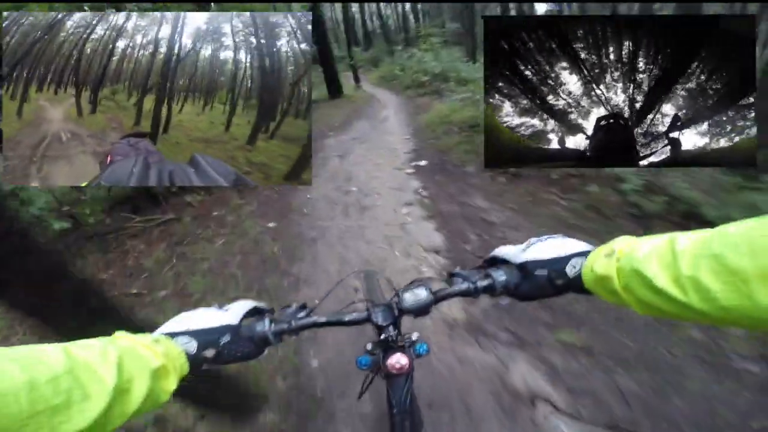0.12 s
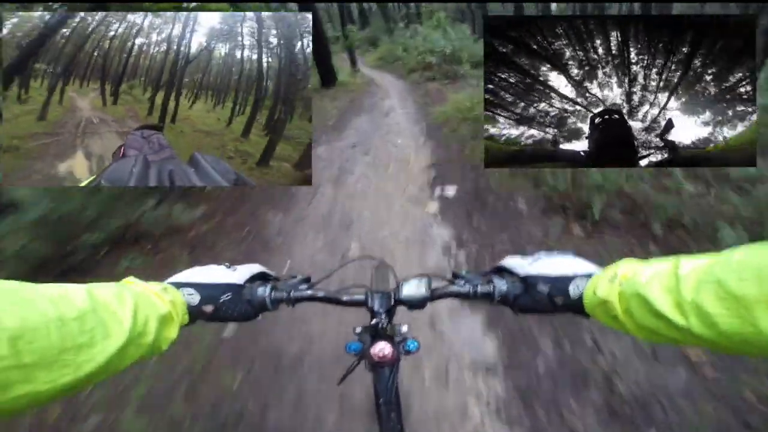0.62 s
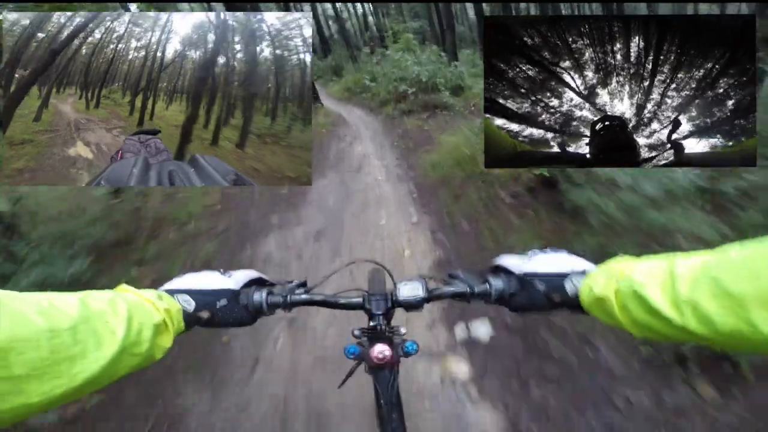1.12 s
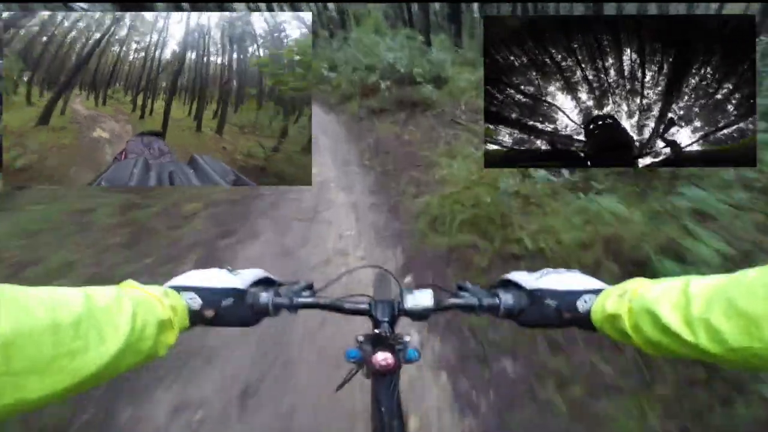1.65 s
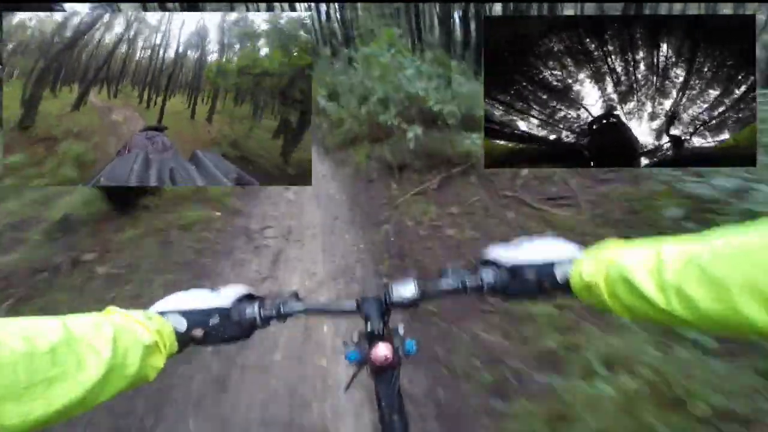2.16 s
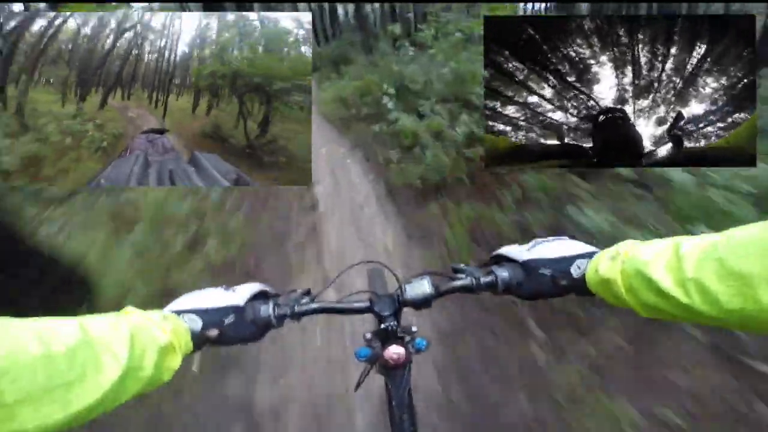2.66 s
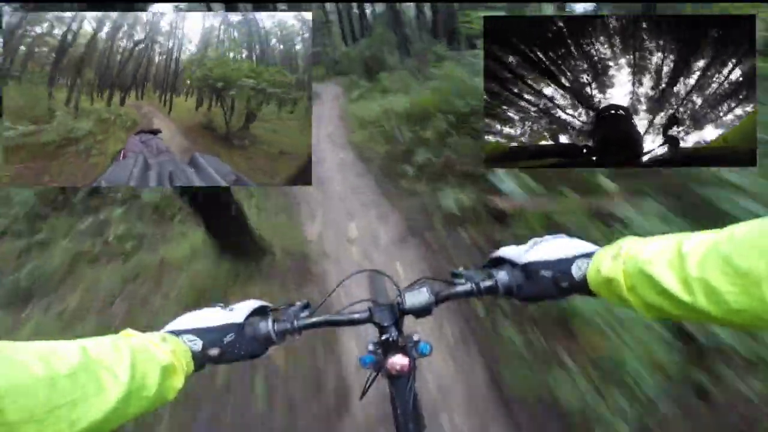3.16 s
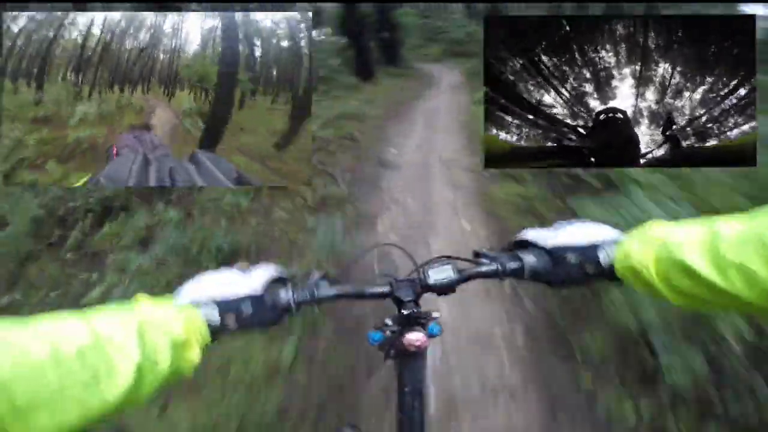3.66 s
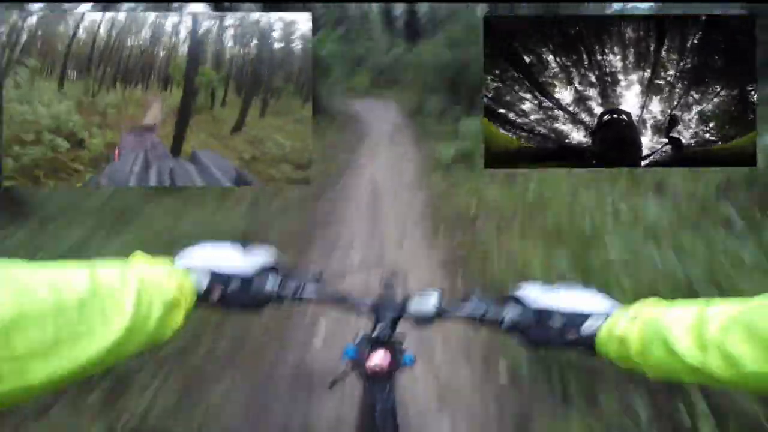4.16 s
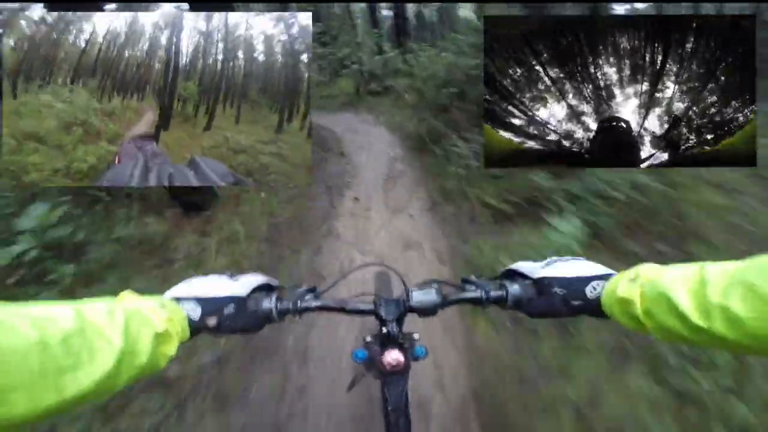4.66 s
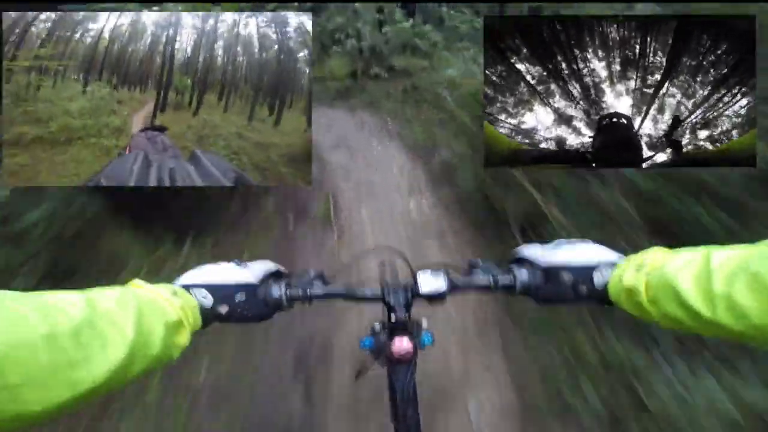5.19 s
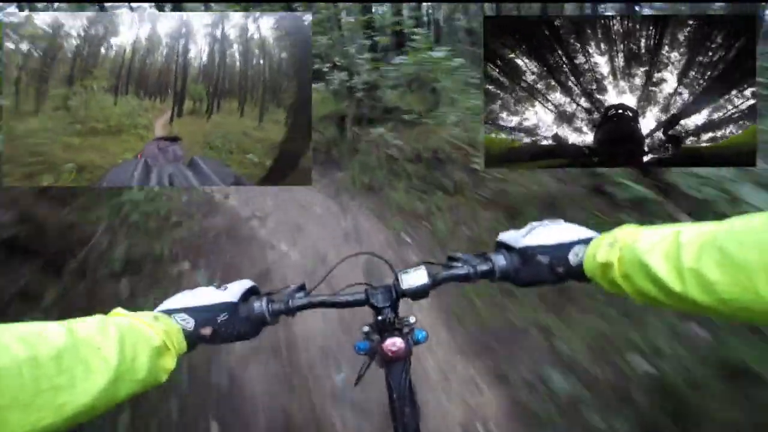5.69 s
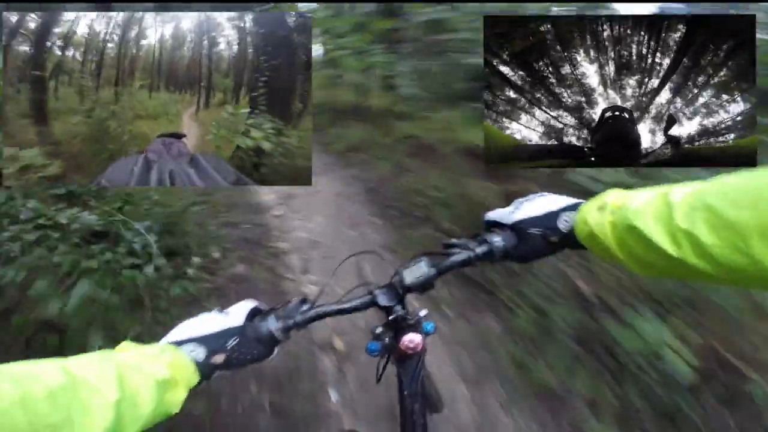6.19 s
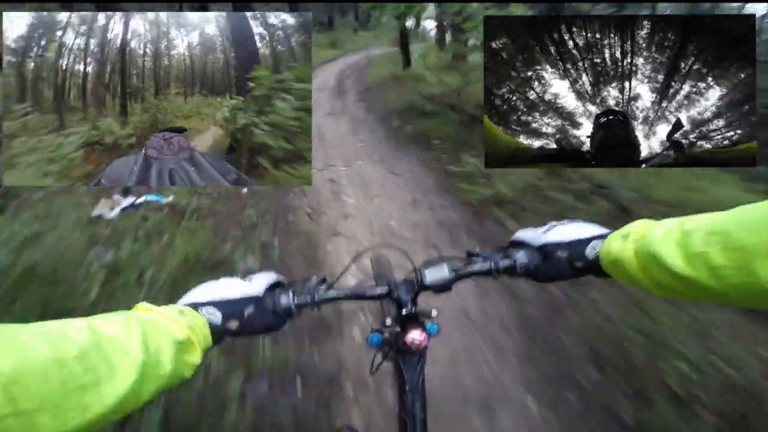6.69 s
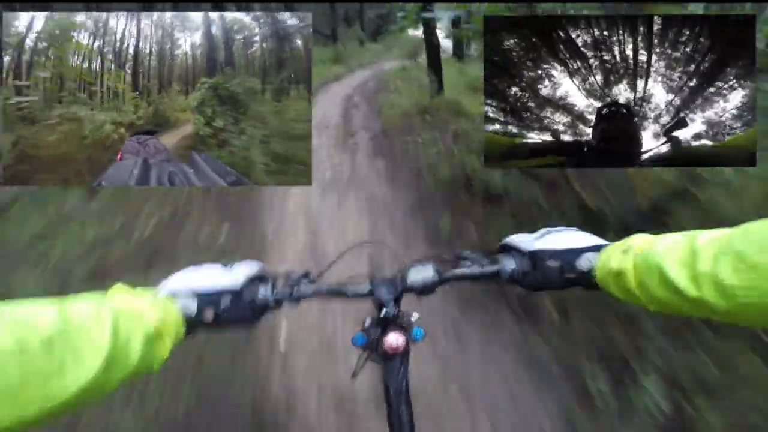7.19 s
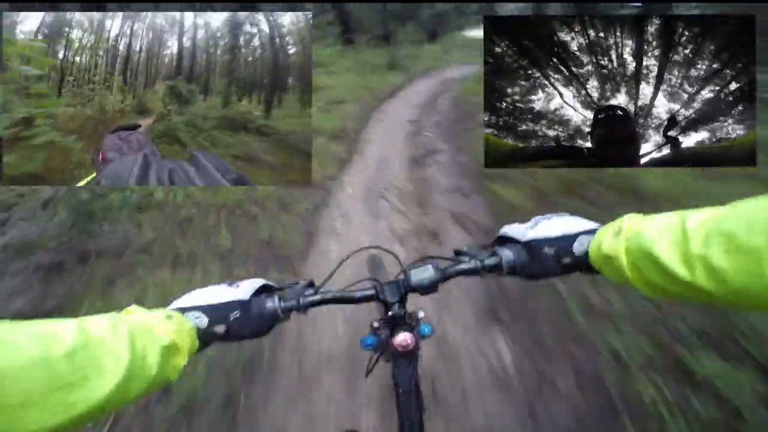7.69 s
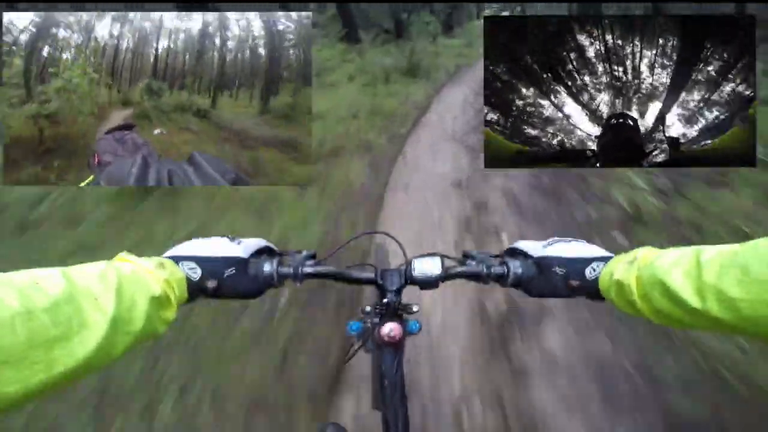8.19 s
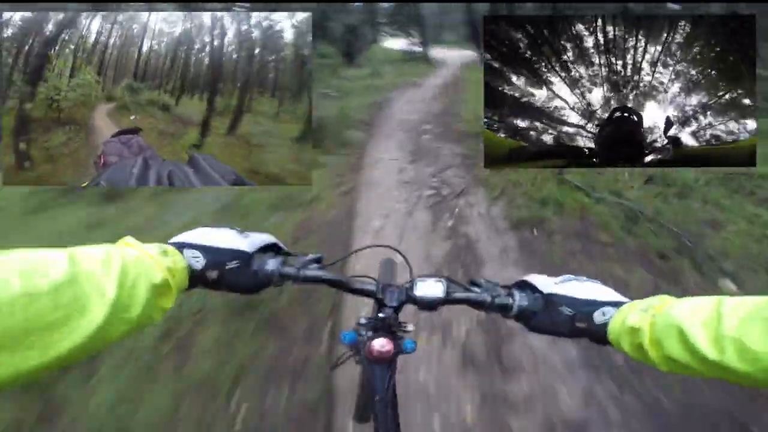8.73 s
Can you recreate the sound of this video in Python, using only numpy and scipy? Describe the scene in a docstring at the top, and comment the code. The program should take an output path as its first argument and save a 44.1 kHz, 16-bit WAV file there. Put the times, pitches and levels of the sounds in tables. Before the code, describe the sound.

Muffled tyre crunch and low bump rumbles on a forest trail, with plastic clatter, hard clicks, brief strap squeaks and faint electronic whine.

```python
"""Fast dirt-trail ride

A mountain bike rolls fast down a dirt trail; the microphone sits in a small camera, in a plastic case
strapped to the rider. Slow noise and short swings make the case heave, thud and rumble over bumps; cracks
in coloured noise are tyres and flung grit; slips ring two squeaks as straps scuff the case; clicks ring
its modes as the camera rattles and snaps inside; steady tones and hiss are the electronics."""
import sys
import numpy as np
from scipy import signal
from scipy.fft import rfft, irfft
from scipy.io import wavfile
from scipy.ndimage import uniform_filter1d

SR = 44100
rng = np.random.default_rng(int(sys.argv[2]) if len(sys.argv) > 2 else 0)


def gain_from_decibels(decibels):
    """Convert decibel values to linear amplitude factors."""
    exponent = np.asarray(decibels, float) / 20
    return 10 ** exponent


def put_to_file(sound):
    """Save the sound as 16-bit audio at rate SR, in the file named by the first command-line argument."""
    columns = np.atleast_2d(sound).T  # one column per channel
    safe = np.clip(columns, -1, 1)
    whole_steps = np.round(safe * 32767)
    wavfile.write(sys.argv[1], SR, whole_steps.astype(np.int16))


N = 389844


def rms_one(x):
    """Scales a signal to rms 1."""
    return x / np.sqrt(np.mean(x ** 2) + 1e-20)


def in_time(rows):
    """Draws straight lines between the rows of a table whose first column is time."""
    s, *columns = np.transpose(rows)
    return [np.interp(np.arange(N) / SR, s, c) for c in columns]


def coloured(x, points):
    """Shapes a signal to a spectrum drawn on a log frequency axis; rms 1."""
    hz, db = np.transpose(points)
    grid = np.maximum(np.arange(N // 2 + 1) * SR / N, 1)
    gain_db = np.interp(np.log(grid), np.log(hz), db, -120, -120)
    return rms_one(irfft(rfft(x) * gain_from_decibels(gain_db), N))


def drift(rate_hz):
    """Slow noise, rms 1: every 20th sample through two equal one-pole low-passes, already run in."""
    r = np.exp(-40 * np.pi * rate_hz / SR)
    slow = signal.lfilter([1], [1, -2 * r, r * r], rng.standard_normal(N // 20 + 2002))[2000:]
    return np.interp(np.arange(N) / 20, np.arange(len(slow)), rms_one(slow))


def ring(clicks, hz, t60):
    """A resonance: a unit click starts a sine of height 1 that falls 60 dB in t60 seconds."""
    r, w = gain_from_decibels(-60 / (t60 * SR)), 2 * np.pi * hz / SR
    return signal.lfilter([0, np.sin(w)], [1, -2 * r * np.cos(w), r * r], clicks + 1e-18)


def grit(per_s, spread_db, share):
    """Random cracks of uneven size over smooth noise; share is the cracks' part of the power."""
    sizes = gain_from_decibels(spread_db * np.minimum(rng.exponential(1, N), 5)) * rng.choice([-1, 1], N)
    share = np.clip(share, 0, 1)
    cracks = rms_one(sizes * (rng.random(N) < per_s / SR))
    return np.sqrt(share) * cracks + np.sqrt(1 - share) * rng.standard_normal(N)


def evened(x, size):
    """Holds the loudness of a slow noise nearly steady over a window of size samples."""
    return x / np.sqrt(uniform_filter1d(x ** 2, size=size) + 0.094)


def bumps(times, peaks_db, ground_db, rise, fall):
    """Gain that climbs to each peak and falls away (dB per second), added in power to the ground."""
    t = np.arange(0, N + 100, 100) / SR
    late = t - times[:, None]
    slope_db = np.where(late < 0, rise * late, -fall * late)
    power = gain_from_decibels(2 * (peaks_db[:, None] + slope_db)).sum(axis=0)
    return np.sqrt(np.interp(np.arange(N) / SR, t, power) + gain_from_decibels(2 * ground_db))


def swings(times, peaks_db, hz, width):
    """One soft to-and-fro at each time, at 0.78 to 1.07 of hz and in any phase, under a bell curve."""
    late = np.linspace(-3 * width, 3 * width, int(6 * width * SR))
    out = np.zeros(N + len(late))
    for s, db, (tune, turn) in zip(times, peaks_db, rng.random((len(times), 2))):
        cycles = hz * (0.78 + 0.29 * tune) * late + turn
        swing = np.sin(2 * np.pi * cycles) * np.exp(-(late / width) ** 2)
        out[int((s + late[0]) * SR):][:len(late)] += gain_from_decibels(db) * swing / np.abs(swing).max()
    return out[:N]


# Roughness of the trail between bumps: time_s, heave_db, thud_db, rumble_db
TRAIL_ROUGHNESS = [(0.0, -39, -53, -55), (1.11, -36.5, -52, -54.5), (2.24, -33.5, -51, -51),
                   (3.03, -39, -52, -54.5), (3.69, -35.5, -56, -54), (4.04, -37, -49, -55),
                   (4.23, -42, -49, -67), (4.41, -35, -50, -54.5), (5.93, -30.5, -52, -52.5),
                   (6.18, -40.5, -52, -53), (6.77, -41, -58, -56.5), (6.99, -29.5, -43.5, -55),
                   (7.14, -35.5, -48.5, -53), (8.84, -40, -54.5, -51)]
# The rider's body lurches over a bump: centre_s, peak_db
BODY_LURCHES = [(.69, -29), (1.061, -33), (1.54, -40), (1.85, -27.5), (2.14, -29), (2.339, -31),
                (2.435, -16.5), (2.728, -41), (3.08, -30), (3.4, -35), (3.689, -28), (3.841, -22.5),
                (3.959, -35), (4.1, -22.5), (4.174, -14), (4.279, -13), (4.376, -19), (4.85, -23.5),
                (5.05, -16.5), (5.218, -23), (5.559, -23), (5.76, -26), (5.86, -36), (5.944, -13.5),
                (6.04, -26), (6.861, -24), (7.071, -23), (7.199, -25.5), (7.641, -22.5), (7.93, -20.5),
                (8.151, -36), (8.301, -19)]
# Colour of the heaving case: frequency_hz, density_db
HEAVE_COLOUR = [(3.5, -10), (6.0, 7), (16, 5), (27, -2.5), (36, -14.5), (70, -24.5), (91, -26), (150, -120)]


def heave():
    """The case heaves slowly on its straps and swings once at each lurch of the rider's body."""
    heave_db = in_time(TRAIL_ROUGHNESS)[0]
    slow = evened(coloured(rng.standard_normal(N), HEAVE_COLOUR), size=5000)
    lurches = swings(*np.transpose(BODY_LURCHES), hz=23.3, width=0.025)
    return slow * gain_from_decibels(heave_db + 3.0 * drift(3.8)) + lurches


# A wheel strikes a root or stone: peak_s, thud_db, rumble_db
WHEEL_STRIKES = [(1.06, -49, -60), (1.551, -42, -64), (1.759, -45, -45), (1.99, -57, -40), (2.21, -55, -56),
                 (2.33, -46, -45.5), (2.453, -38, -61), (2.66, -48, -51), (2.98, -44.5, -66),
                 (3.39, -45, -47.5), (3.82, -55, -43), (3.959, -33, -51), (4.08, -38, -54),
                 (4.15, -24.5, -38), (4.229, -33, -42), (4.331, -35, -47.5), (4.38, -35, -59),
                 (5.048, -40, -42), (5.22, -39.5, -46.5), (5.61, -51, -53), (5.88, -40, -54),
                 (5.93, -32.5, -37.5), (6.009, -32.5, -48.5), (6.82, -48, -45.5), (6.989, -46, -60),
                 (7.09, -41, -61), (7.26, -50, -55), (7.625, -33, -40.5), (7.91, -33, -42),
                 (8.16, -47, -74), (8.302, -41, -42)]
# Colour of the thud: frequency_hz, density_db
THUD_COLOUR = [(26, -32), (45, -8.5), (70, -7.5), (140, -10.5), (170, -13.5), (220, -20), (370, -120)]


def thuds():
    """Lumpy low noise swells and dies at each wheel strike, with a single push inside it."""
    thud_db = in_time(TRAIL_ROUGHNESS)[1] + 2.5 * drift(6.0)
    s, peak_db, _ = np.transpose(WHEEL_STRIKES)
    lumps = evened(coloured(grit(55, 1.4, 0.37), THUD_COLOUR), size=3000)
    punches = swings(s, peak_db + 2.5, hz=78, width=0.0062)
    return punches + lumps * bumps(s, peak_db, thud_db, rise=405, fall=398)


# Colour of the rumble: frequency_hz, density_db
RUMBLE_COLOUR = [(82, -34), (140, -7), (247, 0), (436, -10.5), (1000, -24.5), (1300, -17.5), (2200, -120)]


def rumble():
    """Cracks and noise rumble through the case in lumps, swelling and dying at each wheel strike."""
    rumble_db = in_time(TRAIL_ROUGHNESS)[2]
    s, _, peak_db = np.transpose(WHEEL_STRIKES)
    lumps = coloured(grit(150, 3.56, 0.22) * gain_from_decibels(2.1 * drift(14.0)), RUMBLE_COLOUR)
    return lumps * bumps(s, peak_db, rumble_db, rise=200, fall=230)


def pings(per_s):
    """Random small knocks ring at 24 pitches spread over the treble."""
    sizes = gain_from_decibels(1.7 * np.minimum(rng.exponential(1, N), 4)) * (rng.random(N) < per_s / SR)
    dealt = rng.integers(0, 24, N)
    pitches_hz = np.geomspace(3800, 13000, 24)
    return sum(ring(sizes * (dealt == k), hz, 160 / hz) for k, hz in enumerate(pitches_hz))


# Tyres on grit: time_s, roll_db, spray_db (spray is the fine grit)
TYRE_LEVELS = [(0.0, -52.5, -59), (0.62, -52.5, -59), (0.81, -53, -60), (1.7, -52, -60), (1.97, -47, -58.5),
               (2.66, -52.5, -59.5), (3.1, -51.5, -53.5), (3.4, -51.5, -51.5), (3.64, -47.5, -50.5),
               (4.23, -49.5, -55), (4.6, -51, -51.5), (4.87, -48, -52.5), (5.34, -50.5, -53),
               (5.54, -50, -50), (5.93, -50, -55), (6.15, -52.5, -54.5), (6.45, -53, -56),
               (6.67, -52.5, -53.5), (7.06, -48.5, -52.5), (7.48, -48.5, -51.5), (7.58, -51.5, -53.5),
               (8.27, -49.5, -53.5), (8.47, -47.5, -49), (8.84, -52.5, -53.5)]
# Colour of the rolling tread, as heard through the case: frequency_hz, density_db
ROLL_COLOUR = [(410, -16), (700, -7.5), (1090, -8.5), (1550, -1.5), (1720, -5), (2010, -5), (2490, 2.5),
               (3160, -7), (3480, -6.5), (3810, -21), (4200, -12), (5460, -39), (9240, -120)]
# Colour of the fine grit, as heard through the case: frequency_hz, density_db
SPRAY_COLOUR = [(2120, -24), (3600, 1.5), (3800, -4), (4200, 0), (5110, -5), (5810, 0.5), (6170, -2.5),
                (7700, -7), (8300, -13), (9100, -12), (10200, -11), (11500, -17), (13600, -19),
                (15300, -32)]


def tyres():
    """Tread on grit, coloured by the case; roll and spray flicker partly together."""
    roll_db, spray_db = in_time(TYRE_LEVELS)
    # louder spray flickers more, quiet spray is smoother
    lumps = drift(15) * np.interp(spray_db, [-60, -52], [.45, 1])
    roll_flicker = gain_from_decibels(1.38 * lumps + 0.9 * drift(62))
    roll = coloured(grit(1500, 2.7, 0.26) * roll_flicker, ROLL_COLOUR)
    fine = grit(1200, 3.2, 0.41) + 0.29 * rms_one(pings(500))   # some grit rings on frame and spokes
    spray_flicker = gain_from_decibels(2.1 * lumps + 0.51 * drift(60))
    spray = coloured(fine * spray_flicker, SPRAY_COLOUR)
    return gain_from_decibels(roll_db) * roll + gain_from_decibels(spray_db) * spray


# Faint tones of the camera's circuits: pitch_hz, rms_db
CIRCUIT_TONES = [(5846, -69), (8780, -78), (11687, -88), (11719, -86), (14626, -77), (14653, -87),
                 (14686, -91)]
# Colour of the microphone amplifier's steady hiss: frequency_hz, density_db
AMPLIFIER_HISS = [(500, 15.5), (4000, -8.5), (9000, -11.5), (15200, -6), (15600, -40)]


def whine():
    """Faint circuit tones with gently wandering phase, over steady hiss of the microphone amplifier."""
    t = np.arange(N) / SR
    tones = np.zeros(N)
    for hz, db in CIRCUIT_TONES:
        tones += np.sqrt(2) * gain_from_decibels(db) * np.sin(2 * np.pi * hz * t + 0.35 * drift(2.6))
    return tones + gain_from_decibels(-62.5) * coloured(rng.standard_normal(N), AMPLIFIER_HISS)


# Grit flung at the case: start_s, peak_db, pitch_hz
FLUNG_GRIT = [(0.318, -44, 7000), (1.952, -35.5, 6250), (2.3285, -34, 6100), (2.4049, -45, 8500),
              (3.275, -36, 4730), (3.7013, -36, 4670), (3.8102, -41, 6870), (3.9713, -29, 5940),
              (4.15, -38, 5830), (4.2635, -44, 11400), (4.556, -35, 5030), (4.9801, -36, 4550),
              (5.2285, -39, 4640), (5.6116, -36.5, 5800), (7.0904, -37, 7150), (7.4445, -40, 5900),
              (7.602, -37.5, 6100), (7.812, -32.5, 3260), (7.861, -40, 6170), (3.838, -43, 10300)]


def ticks():
    """Each grain is milliseconds of noise in a band around one pitch; strays come at random from the spray."""
    out, t = np.zeros(N + 600), np.arange(600) / SR
    when, size, pitch = rng.random((80, 3)).T   # 80 stray grains
    spray_db = in_time(TYRE_LEVELS)[1][(when * N).astype(int)]
    stray = np.transpose([when * N / SR, spray_db + 5.5 + 3.0 * size, 4200 * 2.6 ** pitch])
    grains = np.vstack([FLUNG_GRIT, stray])
    for (s, peak_db, hz), burst in zip(grains, rng.standard_normal((len(grains), 600))):
        band = signal.butter(2, [hz / 1.27, min(hz * 1.13, 15000)], "band", fs=SR, output="sos")
        tick = signal.sosfilt(band, burst * np.exp(-t / 0.0066))
        out[round(s * SR):][:600] += gain_from_decibels(peak_db) * tick / np.abs(tick).max()
    return out[:N]


# Straps scuffing on the case: start_s, length_s, low_squeak_db, high_squeak_db, hiss_db
STRAP_SCUFFS = [(0.646, .15, -55, -55.5, -70), (1.779, 0.067, -45.5, -56, -57.5),
                (2.235, 0.089, -37, -47, -45), (3.906, 0.058, -53, -37, -45)]
# Colour of the scuffing hiss: frequency_hz, density_db
SCUFF_COLOUR = [(3000, -35), (5100, -14), (5560, -1.5), (6250, 2), (7800, -1.5), (8420, -16), (9680, -5),
                (11400, -20), (12400, -15), (15000, -27)]
# Low and high squeak, each rung twice in a row: pitch_hz, t60_s (of one ring)
STRAP_SQUEAKS = [(2480, 0.0098), (4350, 0.0019)]


def scuffs():
    """Dense slips rub the case: a rough hiss all through the stroke, two squeaks swelling as it bites."""
    slips = (grit(4000, 2.0, 1.0) + 0.87 * rms_one(pings(800))) * gain_from_decibels(1.6 * drift(76))
    low, high = [rms_one(ring(ring(slips, hz, t60), hz, t60)) for hz, t60 in STRAP_SQUEAKS]
    hiss, out, t = coloured(slips, SCUFF_COLOUR), np.zeros(N), np.arange(N) / SR
    for s, length, low_db, high_db, hiss_db in STRAP_SCUFFS:
        on = (t > s) & (t < s + length)
        # hardest bite at three quarters of the stroke, after a swell of 19 dB
        swell = gain_from_decibels(19 * np.interp((t[on] - s) / length, [0, 0.75, 1], [-1, 0, -.6]))
        squeaks = swell * (gain_from_decibels(low_db) * low[on] + gain_from_decibels(high_db) * high[on])
        rub = squeaks + gain_from_decibels(hiss_db) * hiss[on]
        out[on] = rub * signal.windows.tukey(on.sum(), .3)
    return out


# Modes of the case: pitch_hz, level_db, t60_s, part (0 dull, 1 middle, 2 sharp, 3 edge; fractions drop)
CASE_MODES = [(163.5, 1.5, 0.038, 1), (331, -1, 0.056, 0), (605, 3, 0.017, 0), (805, -3.5, 0.02, 0),
              (1002, -3.5, 0.018, 0.5), (1210, -1.5, 0.025, 1), (1447, 3, 0.016, 1),
              (1913, -14.5, 0.04, 2.5), (1980, 0.5, 0.014, 3), (2334, 3, 0.0069, 2.5),
              (2980, 5.5, 0.013, 3), (3436, -0.5, 0.014, 3), (4670, -9, 0.0072, 3)]


def strike(times, parts_db, scatter_db):
    """Touches at the given times ring all case modes; the contact is too soft to pass the top."""
    at, out = np.minimum((times * SR).astype(int), N - 1), np.zeros(N)
    colour = rng.normal(0, 1, (*times.shape, len(CASE_MODES)))
    for k, (hz, level_db, t60, part) in enumerate(CASE_MODES):
        clicks = np.zeros(N)
        touch_db = parts_db[int(part)] + level_db + scatter_db * colour[..., k]
        np.add.at(clicks, at, gain_from_decibels(touch_db) * (-1) ** k)   # neighbouring modes start in opposite sign
        out += ring(clicks, hz, t60)
    return signal.sosfilt(signal.butter(4, 5400, fs=SR, output="sos"), out)


# Camera clattering loosely in its case, before touch and mode levels:
# start_s, dull_db, middle_db (relative to dull)
LOOSE_RATTLES = [(0.973, -43.5, -8), (1.507, -40.5, -12), (1.563, -45, -17), (1.808, -38.5, -11),
                 (1.968, -41, -19), (2.1, -41, -10), (2.301, -37.5, -22), (2.397, -44, -8),
                 (2.653, -39.5, -14), (2.792, -33.5, -11), (2.918, -39, 0), (3.08, -35.5, -13),
                 (3.211, -41.5, -24), (3.28, -36.5, -10), (3.382, -36, -20), (3.695, -37.5, -25),
                 (3.788, -38, -5), (3.941, -35, -4), (4.07, -45, -8), (4.228, -31.5, -5), (4.333, -42, 4),
                 (4.378, -33, 1.5), (4.411, -44.5, 5), (4.516, -41.5, -21), (4.617, -40.5, -14),
                 (4.725, -37, -8), (4.853, -37.5, -4), (5.044, -39.5, 1.5), (5.439, -38.5, -10),
                 (5.537, -39, -18), (5.629, -38, -13), (5.703, -39.5, -5), (5.827, -37, -2),
                 (6.001, -38, -9), (6.045, -30, -3.5), (6.254, -40.5, -9), (6.376, -33, -11),
                 (6.849, -41, -19), (6.961, -30.5, -8), (7.061, -31.5, -9), (7.143, -35, -16),
                 (7.248, -31.5, -25), (7.365, -32, 3), (7.46, -43, -9), (7.559, -29.5, 7),
                 (7.707, -34, 3.5), (7.928, -28.5, 4), (8.305, -37.5, -4), (8.44, -26, -2.5),
                 (8.741, -41.5, -12)]


def rattles():
    """Eight uneven touches in about sixteen milliseconds; the high modes weaken steadily touch to touch."""
    s, dull_db, middle_db = np.transpose(LOOSE_RATTLES)[:, :, None]
    order = np.arange(8)
    times = s + .002 * (order + 1.215 * rng.random((len(s), 8)) * (order > 0))
    touch_db = dull_db - 3.5 - 2.5 * np.abs(order - .3)
    sharp_db = touch_db + 0.16 * middle_db - 5.0 - 1.3 * order
    return strike(times, [touch_db, touch_db + middle_db, sharp_db, sharp_db - 10], 3.25)


# Camera snapping hard against its case, before mode levels:
# start_s (contact 1 ms later), sharp_db, dull_db, middle_db, edge_db
HARD_SNAPS = [(1.2089, -34, -52, -43, -42.5), (2.0071, -19, -61, -28, -24.5), (2.15, -25.5, -54, -27, -23),
              (2.1894, -52, -52, -62, -56), (2.4297, -39, -56, -51, -42), (2.446, -34, -60, -46, -40),
              (2.7901, -31, -62, -37, -44), (3.73, -34, -41, -56, -39), (3.9834, -22.5, -36.5, -33, -33),
              (4.151, -4.5, -34, -21, -18), (4.38, -34, -54, -29.5, -54), (4.9542, -30, -54, -32.5, -37),
              (4.9937, -43, -51, -45, -41), (5.9226, -13.5, -30, -19, -28), (6.0461, -28, -47, -32, -44),
              (7.3676, -44, -40, -33, -44), (7.62, -23, -32.5, -25, -39), (8.0647, -34, -38.5, -46, -36),
              (8.4548, -23, -43, -36.5, -34)]


def snaps():
    """One clean touch each rings the modes of the case."""
    s, sharp_db, dull_db, middle_db, edge_db = np.transpose(HARD_SNAPS)
    return strike(s + .001, [dull_db, middle_db, sharp_db, edge_db], 1.2)


def scene():
    """Everything that reaches the microphone in the case, summed to one channel."""
    case = heave() + thuds() + rumble()
    ride = tyres() + whine() + ticks() + scuffs()
    camera = rattles() + snaps()
    return (case + ride + camera)[None]


def roll_off(x):
    """The treble ends steeply here."""
    return signal.sosfilt(signal.butter(12, 15690, fs=SR, output="sos"), x)


def record(dry):
    """A steep low-pass cuts the top, at least 60 dB down from 16.3 kHz."""
    low_pass = signal.cheby2(12, 60, 16300, fs=SR, output="sos")
    mix = signal.sosfilt(low_pass, dry)
    return roll_off(mix)


dry = scene()
out = record(dry)
put_to_file(out)
```